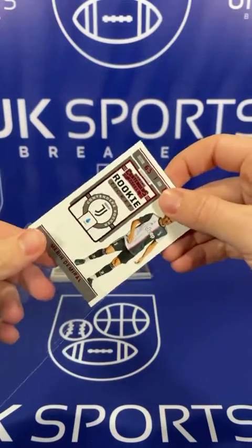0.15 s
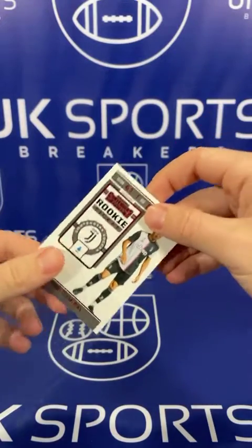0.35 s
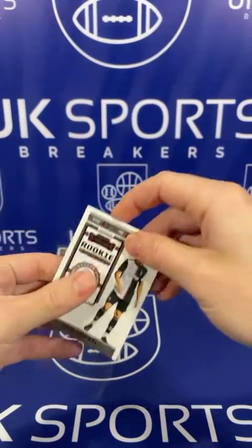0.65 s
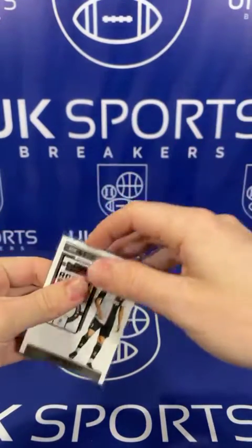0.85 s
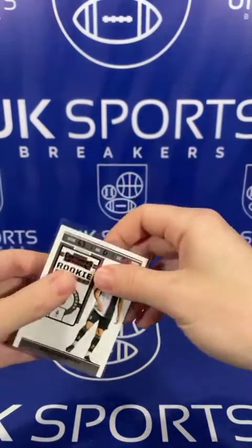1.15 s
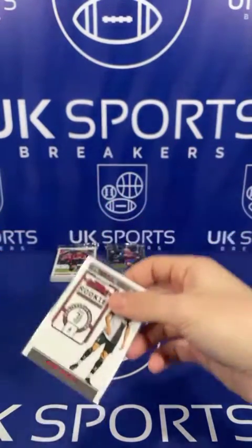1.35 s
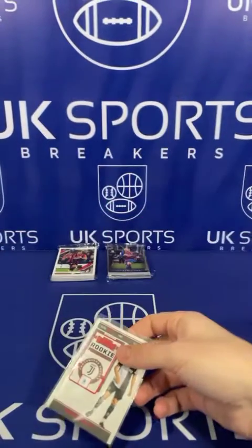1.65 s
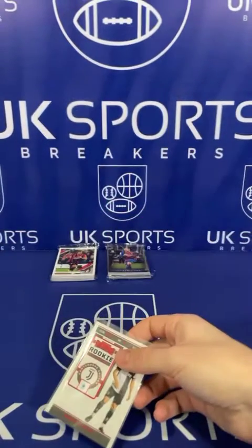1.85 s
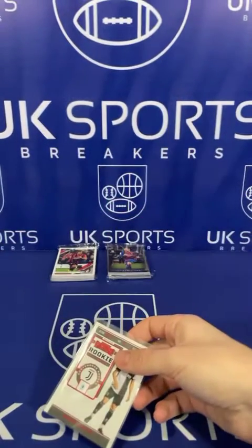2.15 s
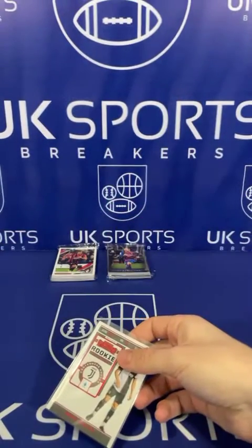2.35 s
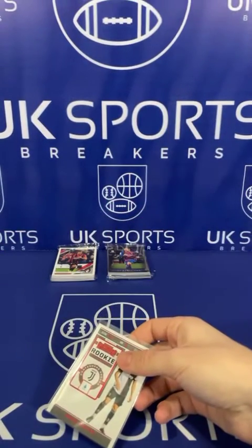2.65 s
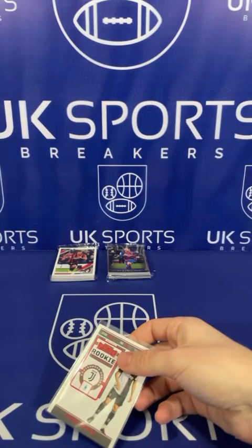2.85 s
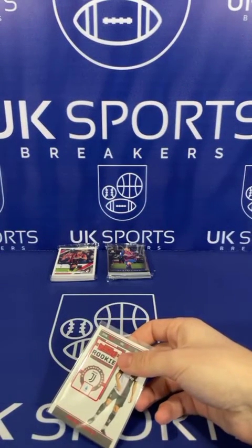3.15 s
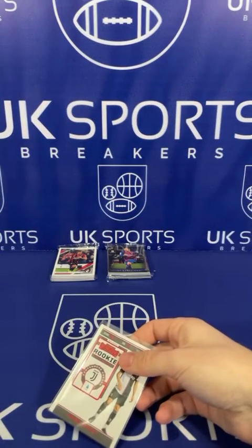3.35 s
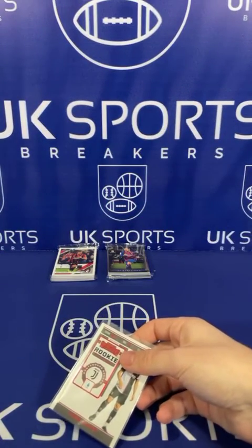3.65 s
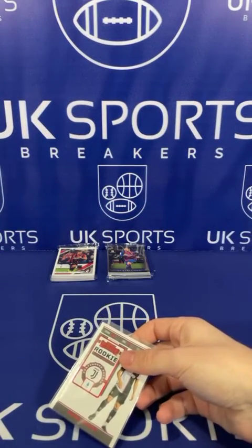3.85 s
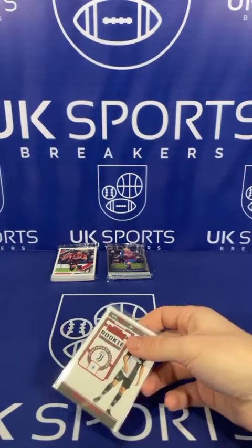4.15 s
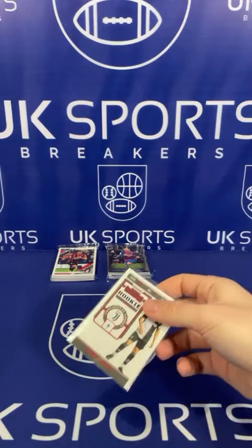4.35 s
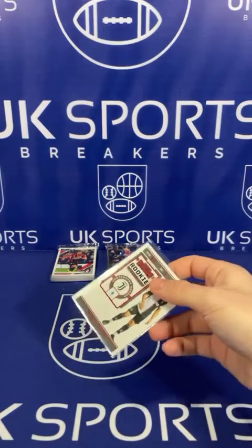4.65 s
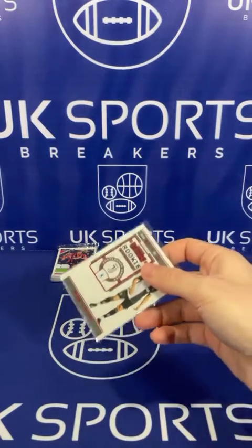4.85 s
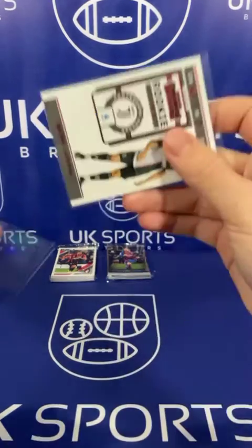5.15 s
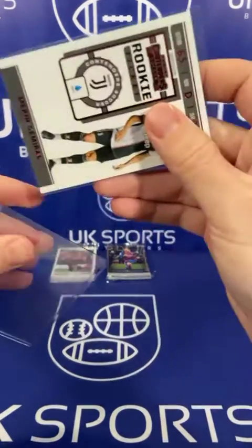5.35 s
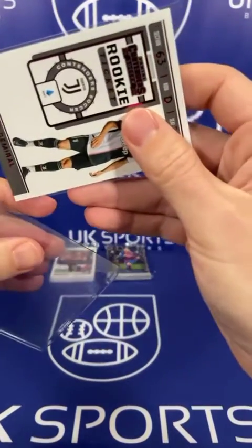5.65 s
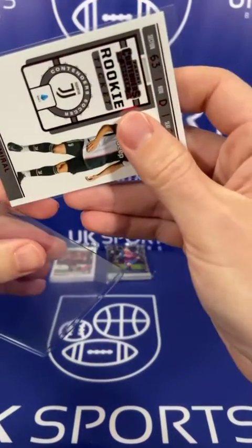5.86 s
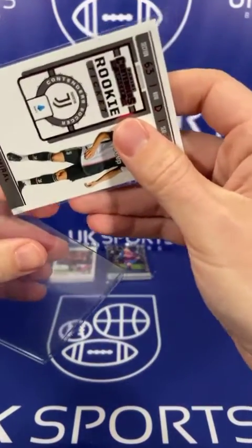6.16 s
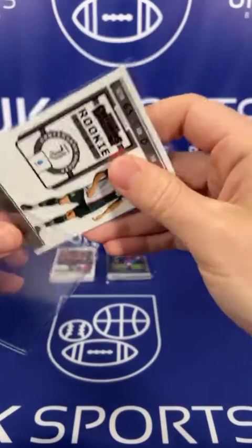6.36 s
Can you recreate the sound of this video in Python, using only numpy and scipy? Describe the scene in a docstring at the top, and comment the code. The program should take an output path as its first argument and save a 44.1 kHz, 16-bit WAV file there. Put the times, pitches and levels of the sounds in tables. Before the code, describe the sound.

Soft sleeve rustling and finger rubbing come first, with small clicks. After a short lull, hard plastic cases clack against each other and the table, then one bent case cracks, by far the loudest event. A juddering scrape follows, then crisp film rustle, brief high squeaks and a few dull taps. Close microphone, short indoor reflections, low ventilation hum.

```python
"""A trading card is slid into a soft plastic sleeve, close, in a small humming room: film hiss, rub, ticks.
Stiff plastic holders then knock and graze; one snaps loudly, and holder edges are scraped off the stack.
The sleeved card rustles, squeaks and ticks again among a few knocks, then gives a last faint rustle.
Slides are slip noise under stroke envelopes; contacts are noise bursts through plastic and table
resonances; squeaks are gliding sines; the steady room is shaped noise and hum lines."""
import sys
import numpy as np
from scipy import signal
from scipy.fft import rfft, irfft, next_fast_len
from scipy.io import wavfile
from scipy.ndimage import map_coordinates

SR = 44100
rng = np.random.default_rng(int(sys.argv[2]) if len(sys.argv) > 2 else 0)


def transcribe(u):
    """Save the signal u as a 16-bit wav file named by the first command-line argument.

    u: samples, shape (n,) or (channels, n), limited to [-1, 1]; the rate is SR.
    q: integer samples, one column per channel.
    """
    v = np.clip(np.atleast_2d(u).T, -1, 1)
    q = np.round(v * 32767).astype(np.int16)
    wavfile.write(sys.argv[1], SR, q)


N = 286650
TIME = np.arange(N) / SR  # s
HIT = TIME[:SR // 4]  # s, span of one contact

# pushes of film over card: peak_s, rise_s, fade_t60_s, hiss_db, rub_db
PUSHES = [(.16, 0.24, 0.39, -84, -71.5), (0.295, 0.063, 0.59, -58.5, -61.5), (0.46, .06, 0.26, -66, -66),
          (0.555, 0.16, 0.15, -54.5, -66), (0.61, 0.018, 0.096, -58, -56), (0.848, 0.11, .09, -48.5, -63),
          (1.008, 0.015, 0.11, -56, -59), (1.14, 0.035, 0.13, -59, -61.5),
          (4.075, 0.056, 0.42, -61.5, -65.5), (4.2, 0.087, 0.25, -64, -67),
          (4.272, 0.029, 0.12, -52.5, -71), (4.345, 0.025, 0.077, -55, -66.5),
          (4.43, 0.064, 0.22, -70, -67), (4.69, 0.11, 0.57, -61, -59.5), (4.79, 0.037, .06, -70, -64),
          (4.835, 0.033, 0.44, -66.5, -60.5), (4.931, 0.042, 0.09, -50.5, -53.5),
          (6.18, 0.049, 0.63, -69, -71.5), (6.35, 0.12, 0.35, -56.5, -73.5), (6.42, 0.054, 0.13, -60, -77)]
# film hiss spectrum: freq_hz, relative_db
HISS_SPECTRUM = [(2350, -18), (4000, -13), (7660, -3.5), (11800, -4), (13400, -0.5), (15100, 0.5),
                 (16000, -7.5)]
# finger rub spectrum: freq_hz, relative_db
RUB_SPECTRUM = [(410, -26), (700, -10), (1180, 0), (2190, -7.5), (2750, -2.5), (3360, -8.5), (3970, -3),
                (12000, -13.5), (15600, -48), (22000, -120)]
# card edge and sleeve ticks: start_s, level_db, brightness_db, ring_hz
TICKS = [(0.143, -82.5, -11.5, 1070), (.168, -84, -7, 1470), (0.1899, -78, -4, 1100),
         (0.29, -65.5, -2, 1500), (0.6102, -72, 7, 6800), (0.694, -78.5, 0, 4300), (0.852, -58, 3, 7140),
         (0.861, -72, -1, 1240), (1.002, -63.5, 1, 2610), (1.017, -71, 5, 7580), (1.126, -71.5, -3, 1090),
         (1.141, -70.5, 1, 8560), (1.644, -81.5, 5, 7960), (1.976, -78, -7, 2500), (2.932, -65, 0, 6000),
         (3.185, -80.5, -4, 5600), (3.244, -79.5, 16, 8830), (3.341, -84.5, 0, 5670),
         (3.547, -89.5, -10, 1120), (3.593, -88.5, -11, 1720), (3.668, -67.5, -3, 6030),
         (3.762, -67, 1, 5060), (3.795, -70.5, 1, 7460), (3.98, -76.5, -3, 915), (4.3931, -74.5, -2, 1330),
         (4.572, -71.5, 2, 6500), (5.246, -85.5, -3, 5450), (5.283, -85, 0, 5450),
         (6.4248, -73.5, -1, 1520), (6.4914, -65, -1.5, 2460)]
# squeaks of film and groans of holders: start_s, length_s, start_hz, end_hz, level_db
SQUEAKS = [(1.757, 0.043, 335, 275, -46.5), (2.39, .14, 950, 967, -66), (4.25, .022, 11500, 14100, -63),
           (4.265, 0.0097, 7200, 6200, -49), (4.271, 0.013, 4400, 3700, -59.5),
           (4.33, 0.017, 5000, 7950, -60), (4.337, .014, 12500, 14000, -56),
           (4.903, 0.011, 14000, 11100, -53.5), (4.916, 0.015, 10500, 13000, -52),
           (4.915, 0.029, 4000, 3660, -58), (5.381, 0.01, 4900, 4550, -61)]
# holders knocking on the stack: start_s, clack_db, thud_over_clack_db, crack_over_clack_db, thud_hz, ring_hz
KNOCKS = [(1.718, -57.5, 2.5, -5.5, 536, 1110), (1.76, -67, 12.5, -14, 287, 1520),
          (1.815, -68, 6.5, -11, 880, 930), (1.843, -62.5, -1, -25, 597, 1130),
          (1.945, -64, -5, -16, 494, 2280), (1.998, -51.5, 0.5, -6.5, 527, 910),
          (2.032, -61.5, -2, -5, 427, 2140), (2.065, -53, -14, -15, 495, 2580),
          (2.475, -66, 3, -25, 935, 940), (2.866, -48, -2, -7, 385, 1620),
          (2.882, -66, 12.5, -12, 460, 1200), (3.729, -54, -1, -19, 400, 1270),
          (3.752, -52, 0, -22, 164, 1860), (3.869, -59.5, -2, -26, 580, 1940),
          (3.879, -57.5, -12, -16, 400, 1140), (4.461, -61, 7.5, -7, 260, 1250),
          (4.502, -55.5, 4, -20, 189, 1700), (4.513, -60, 2, -8, 400, 1230),
          (4.541, -68.5, 8, 4, 248, 5900), (4.597, -74, 8, -7, 302, 1210), (4.956, -71, 9.5, -8, 251, 990),
          (5.391, -74.5, 4, -20, 420, 3000)]
# holder resonances: centre_hz, width_hz, relative_db
PLASTIC_MODES = [(1000, 440, -2.5), (1646, 69, 4), (1970, 45, 1), (2281, 24, -0.5), (2482, 25, 0),
                 (2972, 40, -10.5), (3540, 230, -11)]
# table top resonances: centre_hz, width_hz, relative_db
TABLE_MODES = [(133, 31, 4), (233.8, 60, -8.5), (313, 44, 0.5), (521, 75, 1.5)]
# bent holder springing back: start_s, level_db
SNAPS = [(2.9809, -3.5)]
# chatter spectrum after the snap: freq_hz, relative_db
SNAP_SPECTRUM = [(60, -29.5), (110, -4.5), (520, -4), (690, -8.5), (860, -2), (1650, -1.5), (1950, 0),
                 (2550, 2), (2800, -9), (3400, -2), (3900, -13), (7900, -16.5), (10500, -20.5),
                 (16000, -20)]
# holder pulled off the stack: start_s, length_s, level_db
PULLS = [(3.619, 0.13, -37.5), (3.825, 0.063, -51.5)]
# edge scrape spectrum: freq_hz, relative_db
SCRAPE_SPECTRUM = [(320, -40), (550, -8), (644, -8.5), (691, -10.5), (916, 3), (1300, -7), (1490, -1),
                   (1870, -0.5), (2370, -17.5), (3550, -16.5), (4500, -30), (5850, -60), (9900, -120)]
# bright grit spectrum of the scrape: freq_hz, relative_db
GRIT_SPECTRUM = [(1470, -38), (2500, -7), (5350, -11), (8400, -13), (10100, -22), (14500, -18),
                 (16000, -33)]
# holders grazing each other: peak_s, rise_s, fade_t60_s, level_db
GRAZES = [(1.728, .012, 0.55, -52), (1.85, 0.058, 0.59, -58), (2.0, 0.044, 0.38, -52.5),
          (2.1, .04, .35, -59), (2.425, 0.042, 0.33, -59.5), (2.872, 0.012, 0.19, -39.5),
          (2.93, 0.034, 0.29, -53.5), (4.52, 0.021, 0.28, -49.5), (4.7, 0.044, 0.87, -67),
          (4.83, 0.022, 0.38, -60.5), (5.395, 0.02, 0.5, -64)]
# graze spectrum: freq_hz, relative_db
GRAZE_SPECTRUM = [(90, -25.5), (140, -5), (260, -2.5), (400, -11.5), (520, -4.5), (680, -10), (950, -4.5),
                  (1400, -9.5), (2500, -10.5), (3200, -15), (7000, -19.5), (10000, -25), (16000, -25)]
# soft bumps of the hands: start_s, length_s, pitch_hz, level_db
BUMPS = [(0.9, 0.56, 63, -55), (3.87, 0.12, 153, -55.5), (4.483, 0.2, 71.5, -54.5), (5.279, 0.099, 40, -55)]
# room hiss spectrum: freq_hz, relative_db
AIR_SPECTRUM = [(260, -29), (450, -3), (563, -7), (589, -7.5), (1220, -14.5), (1490, -14.5), (1700, -11.5),
                (5220, -22.5), (14200, -28.5), (16000, -28)]
# low room drone spectrum: freq_hz, relative_db
DRONE_SPECTRUM = [(20, -31), (42, -16.5), (57, 1.5), (75, -13.5), (100, -3), (120, -12), (145, -4.5),
                  (175, -8), (245, -14.5), (305, -10), (360, -14.5), (450, -23.5), (700, -40)]
# mains and fan lines: freq_hz, level_db
HUM_LINES = [(60, -65), (100, -61.5), (143, -62), (301, -65.5)]
# decay of the room: freq_hz, t60_s
ROOM_DECAY = [(120, 0.57), (500, 0.38), (2000, 0.23), (6000, 0.23), (15000, 0.16)]

HISS_SWELL_DB, RUB_SWELL_DB = 16, 11  # the hiss follows speed more steeply than the rub
GRAZE_SWELL_DB = 7.5
GRIP_S, PULL_GRIP_S = 0.0087, 0.022  # time to start sliding; the stiff holder takes longer
PULL_ATTACK_S, PULL_SWELL_DB, PULL_T60_S = 0.061, 13.5, 0.25
SING_HZ, SINK_HZ_PER_S, SING_LOW_HZ, SING_CUTOFF_HZ = 1730, 7200, 1105, 130
SING_DB, GRIT_DB, RUMBLE_DB = -2.5, -14, -8.5  # re scrape
RUMBLE_LAG_S = 0.048  # the table takes up the judder late
SIZZLE_DB, TICK_RING_DB = -4, -1  # re click
KNOCK_RING_DB = 1.5
AIR_DB, DRONE_DB = -67.5, -58
TOP_HZ = 16000


def amp(db):
    """Decibels to gain."""
    return 10 ** (np.asarray(db) / 20)


def unit(x):
    """Scale to rms 1."""
    return x / np.sqrt(np.mean(x ** 2) + 1e-20)


def along(points, hz):
    """(freq_hz, value) points interpolated on a log frequency axis."""
    point_hz, value = np.transpose(points)
    return np.interp(np.log(hz + 1), np.log(point_hz + 1), value)


def wobble(rate_hz):
    """Smooth random curve, rate_hz knots a second."""
    knots = rng.standard_normal(int(N * rate_hz / SR) + 4)
    return map_coordinates(knots, [TIME * rate_hz])


def add(track, start_s, sound):
    """Mix a sound into a track at start_s."""
    part = track[max(0, round(start_s * SR)):][:len(sound)]
    part += sound[:len(part)]


def filtered(x, response):
    """x times a response of frequency, zero-padded."""
    size = next_fast_len(len(x) + 8192)
    return irfft(rfft(x, size) * response(np.fft.rfftfreq(size, 1 / SR)), size)[:len(x)]


def coloured(x, spectrum, size=4096):
    """x through a causal minimum-phase filter of the given spectrum, at rms 1."""
    gain = amp(along(spectrum, np.fft.rfftfreq(size, 1 / SR)))
    cepstrum = irfft(np.log(np.maximum(gain, 1e-6)))
    cepstrum[1:size // 2] *= 2  # fold to minimum phase
    cepstrum[size // 2 + 1:] = 0
    impulse = irfft(np.exp(rfft(cepstrum)))
    return unit(signal.fftconvolve(x, impulse)[:len(x)])


def band(x, lo_hz, hi_hz, order=2):
    """Causal band-pass, at rms 1."""
    edges_hz = [lo_hz, min(hi_hz, SR / 2 - 100)]
    return unit(signal.sosfilt(signal.butter(order, edges_hz, 'band', fs=SR, output='sos'), x))


def ringing(x, modes):
    """x through the resonances of a body, alternating in sign, at rms 1."""
    def response(f):
        total = 0
        for k, (centre_hz, width_hz, db) in enumerate(modes):
            damping = 1j * f * width_hz
            total = total + (-1) ** k * amp(db) * damping / (centre_hz ** 2 - f * f + damping)
        return total
    return unit(filtered(x, response))


def ring(hz, t60_s):
    """One briefly ringing resonance, at rms 1."""
    return unit(np.sin(2 * np.pi * hz * HIT) * amp(-60 * HIT / t60_s) * (1 - np.exp(-HIT / .0006)))


def burst(t60_s, attack_s=0.00023):
    """Dying noise chatter of one contact."""
    return rng.standard_normal(len(HIT)) * amp(-60 * HIT / t60_s) * (1 - np.exp(-HIT / attack_s))


def friction(rate_hz, smooth, decay_s):
    """Tiny slips of random size, rate_hz a second, each a brief scratch, over smooth rubbing noise."""
    slips = (rng.random(N) < rate_hz / SR) * rng.standard_normal(N) ** 2
    power = signal.lfilter([1], [1, -np.exp(-2 / (decay_s * SR))], slips)
    scratches = unit(np.sqrt(power) * rng.standard_normal(N))
    return scratches + smooth * rng.standard_normal(N)


def stroke(peak_s, rise_s, t60_s, swell_db, hold_s=0, grip_s=GRIP_S):
    """Envelope of a slide: takes hold, swells by swell_db to its peak, holds and dies away."""
    t = TIME - peak_s
    grip = np.clip((t + rise_s) / grip_s, 0, 1)
    swell = swell_db * np.clip(t / rise_s, -1, 0)
    fade = 60 * np.maximum(t - hold_s, 0) / t60_s
    return grip * amp(swell - fade)


def in_room(x, wet_db, delay_s=.003):
    """Sound plus the answer of the table and near walls: a noise tail decaying by frequency."""
    hz, t, z = signal.stft(rng.standard_normal(SR // 2), SR, nperseg=256)
    decay = amp(-60 * t / along(ROOM_DECAY, hz)[:, None])
    tail = signal.istft(z * decay, SR, nperseg=256)[1]
    tail = np.pad(tail / np.linalg.norm(tail), (int(delay_s * SR), 0))
    return x + amp(wet_db) * signal.fftconvolve(x, tail)[:len(x)]


def sleeve():
    """Thin film hisses over the card while the fingers rub and crinkle it lower down."""
    hiss = coloured(friction(rate_hz=2500, smooth=1.0, decay_s=0.00027), HISS_SPECTRUM)
    hiss = hiss * amp(1.3 * wobble(54))
    rub = coloured(friction(rate_hz=350, smooth=1.0, decay_s=0.0016), RUB_SPECTRUM)
    rub = rub * amp(3.0 * wobble(45))
    out = np.zeros(N)
    for peak_s, rise_s, t60_s, hiss_db, rub_db in PUSHES:
        out += amp(hiss_db) * stroke(peak_s, rise_s, t60_s, HISS_SWELL_DB) * hiss
        out += amp(rub_db) * stroke(peak_s, rise_s, t60_s, RUB_SWELL_DB) * rub
    return out


def ticks():
    """Card edge catches and film flicks: short, nearly dry; bright ticks trade flex for sizzle."""
    out = np.zeros(N)
    for start_s, db, bright_db, ring_hz in TICKS:
        flex = amp(-bright_db) * band(burst(t60_s=0.02, attack_s=0.00033), 800, 3150)
        click = band(burst(t60_s=0.0061, attack_s=0.00036), 4900, 8700, order=3)
        sizzle = band(burst(t60_s=0.012, attack_s=0.0011), 9300, 15800, order=3)
        sizzle = amp(SIZZLE_DB + bright_db) * sizzle
        ping = amp(TICK_RING_DB) * ring(ring_hz, t60_s=.012)  # the flicked patch rings
        add(out, start_s, amp(db) * in_room(flex + click + sizzle + ping, wet_db=-12.5))
    return out


def squeaks():
    """Plastic sticks and slips so fast that it chirps or groans: gliding sines of unsteady pitch."""
    out = np.zeros(N)
    for start_s, length_s, start_hz, end_hz, db in SQUEAKS:
        u = np.linspace(0, 1, int(length_s * SR))
        glide_hz = start_hz + (end_hz - start_hz) * u
        hz = glide_hz * (1 + 0.052 * wobble(1460)[:len(u)])
        chirp = np.sin(np.pi * u) * np.sin(2 * np.pi * np.cumsum(hz) / SR)
        add(out, start_s, amp(db) * unit(chirp))
    return in_room(out, wet_db=-10.5)


def knocks():
    """Each contact cracks at the edge, rings the holder and thuds into the table."""
    crack_spectrum = [(2000, -21.0), (3600, 0), (7500, -2.0), (11000, -12), (16000, -13)]  # Hz, dB
    out = np.zeros(N)
    for start_s, db, thud_db, crack_db, thud_hz, ring_hz in KNOCKS:
        push = burst(t60_s=0.027, attack_s=.001)
        thud = ringing(push, TABLE_MODES) + .5 * band(push, 130, 1200)
        thud = band(thud, thud_hz * 0.76, thud_hz * 1.4)
        boom = amp(-8.5) * band(burst(t60_s=0.099, attack_s=0.011), 115, 230)  # whole table, slower
        body = 1.03 * ringing(burst(t60_s=0.0033), PLASTIC_MODES)
        rattle = 1.3 * band(burst(t60_s=0.028, attack_s=.0015), 850, 3200)
        ping = amp(KNOCK_RING_DB) * ring(ring_hz, t60_s=.018)  # favoured by the point of contact
        clack = unit(body + rattle + ping)
        crack = coloured(burst(t60_s=0.0054, attack_s=0.0033), crack_spectrum)
        brush = amp(-18.0) * band(burst(t60_s=.03), 900, 9000, order=1)
        knock = clack + amp(thud_db) * (thud + boom) + amp(crack_db) * crack
        add(out, start_s, amp(db) * in_room(knock, wet_db=-9.0))
        add(out, start_s - .004, amp(db + crack_db) * brush)  # edges brush just before they meet
    return out


def snap():
    """A bent holder creeps, lets go with a sharp crack and rings against the stack."""
    crack_spectrum = [(500, -21.5), (1800, -4.5), (4500, -4.0), (8000, -3.0), (11000, -7.5),
                      (16000, -2.5)]  # Hz, dB
    out = np.zeros(N)
    for start_s, db in SNAPS:
        creep = band(burst(t60_s=0.1), 1200, 3500) + 0.15 * band(burst(t60_s=.05), 3500, 14000)
        crack = coloured(burst(t60_s=0.011, attack_s=.0001), crack_spectrum)
        chatter = coloured(burst(t60_s=0.15) * amp(2.5 * wobble(350)[:len(HIT)]), SNAP_SPECTRUM)
        body = ringing(signal.unit_impulse(len(HIT)), PLASTIC_MODES)
        thud = ringing(burst(t60_s=0.0292), TABLE_MODES)
        impact = amp(-30.5) * crack + amp(-32.5) * chatter + amp(-45.5) * thud
        release = amp(-38.5) * body + in_room(impact, wet_db=-4.5)
        add(out, start_s - .008, amp(db - 52) * creep)
        add(out, start_s + 0.00043, amp(db) * release)
    return out


def drag():
    """A holder's edge judders over the stack; its resonance sinks as more of it comes free."""
    out = np.zeros(N)
    lowpass = signal.butter(2, SING_CUTOFF_HZ, fs=SR, output='sos')
    for start_s, length_s, db in PULLS:
        pull = stroke(start_s + PULL_ATTACK_S, PULL_ATTACK_S, PULL_T60_S, PULL_SWELL_DB,
                      hold_s=length_s - PULL_ATTACK_S, grip_s=PULL_GRIP_S)
        centre_hz = np.clip(SING_HZ - SINK_HZ_PER_S * (TIME - start_s), SING_LOW_HZ, SING_HZ)
        slips = friction(rate_hz=530, smooth=0.98, decay_s=0.0014)
        # shift centre_hz to 0 Hz, low-pass, shift back: a moving resonance
        turn = np.exp(2j * np.pi * np.cumsum(centre_hz) / SR)
        sing = unit(np.real(turn * signal.sosfilt(lowpass, slips / turn)))
        scrape = coloured(slips, SCRAPE_SPECTRUM) + amp(SING_DB) * sing
        scrape = scrape + amp(GRIT_DB) * coloured(slips, GRIT_SPECTRUM)
        rumble = amp(RUMBLE_DB) * band(ringing(slips, TABLE_MODES), 106, 410)
        late_pull = np.interp(TIME - RUMBLE_LAG_S, TIME, pull)
        out += amp(db) * (pull * scrape + late_pull * rumble)
    return in_room(out, wet_db=-9.5)


def shuffle():
    """Holders graze each other around the knocks: coarse slip noise under strokes."""
    graze = coloured(friction(rate_hz=290, smooth=.8, decay_s=0.0017), GRAZE_SPECTRUM)
    level = np.zeros(N)
    for peak_s, rise_s, t60_s, db in GRAZES:
        level += amp(db) * stroke(peak_s, rise_s, t60_s, GRAZE_SWELL_DB)
    return in_room(level * graze, wet_db=-9.0)


def bumps():
    """Moving hands stir a low, soft rumble: narrow noise under a smooth swell."""
    out = np.zeros(N)
    for start_s, length_s, hz, db in BUMPS:
        swell = np.hanning(int(length_s * SR))
        rumble = band(rng.standard_normal(N), hz * 0.81, hz * 1.11)[-len(swell):]
        add(out, start_s, amp(db) * unit(swell * rumble))
    return out


def room_tone():
    """Ventilation: a faint even hiss, a drone in the room's low modes and wavering hum lines."""
    hiss = amp(AIR_DB) * coloured(rng.standard_normal(N), AIR_SPECTRUM)

    def drone_gain(hz):
        above_top = hz > DRONE_SPECTRUM[-1][0]
        return amp(along(DRONE_SPECTRUM, hz) - 120 * above_top)
    drone = amp(DRONE_DB) * unit(filtered(rng.standard_normal(N), drone_gain))
    hum = np.zeros(N)
    for hz, db in HUM_LINES:
        level = 1 + 0.3 * wobble(11)
        phase = 2 * np.pi * hz * TIME + 2.11 * wobble(9.7)
        hum += amp(db) * unit(level * np.sin(phase))
    return hiss + drone + hum


def scene():
    """Mono sum: sleeve, holders, hands and room."""
    card = sleeve() + ticks() + squeaks()
    holders = knocks() + snap() + drag() + shuffle()
    return (card + holders + bumps() + room_tone())[None]


def record(dry):
    """Band limit: a 200 Hz wide linear roll-off centred on TOP_HZ."""
    def response(hz):
        return np.clip((TOP_HZ - hz) / 200 + .5, 0, 1)
    return np.array([filtered(channel, response) for channel in dry])


dry = scene()
out = record(dry)
transcribe(out)
```